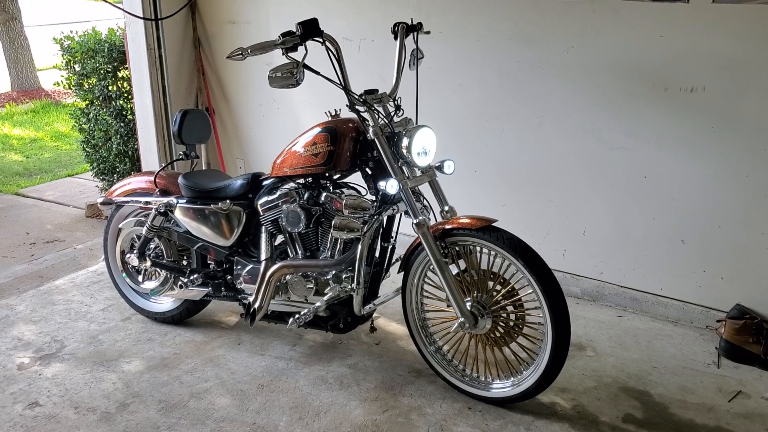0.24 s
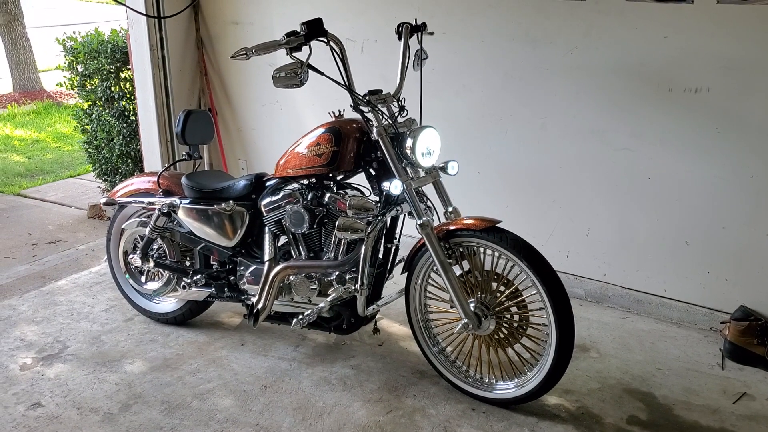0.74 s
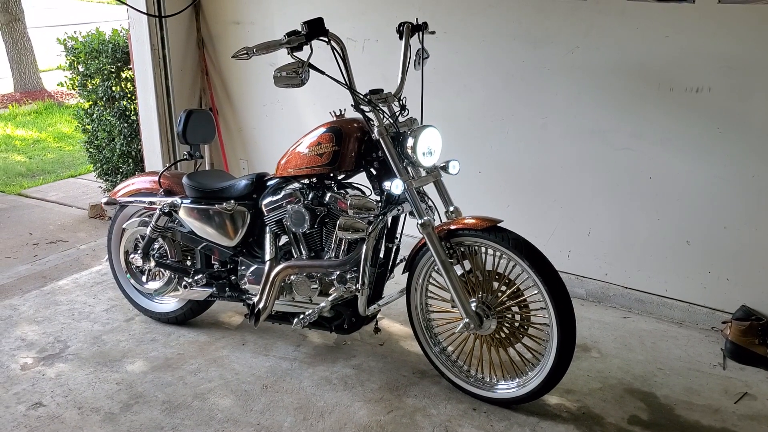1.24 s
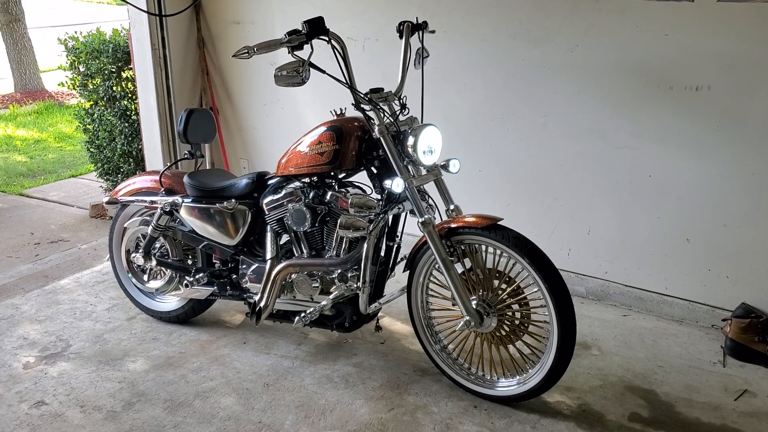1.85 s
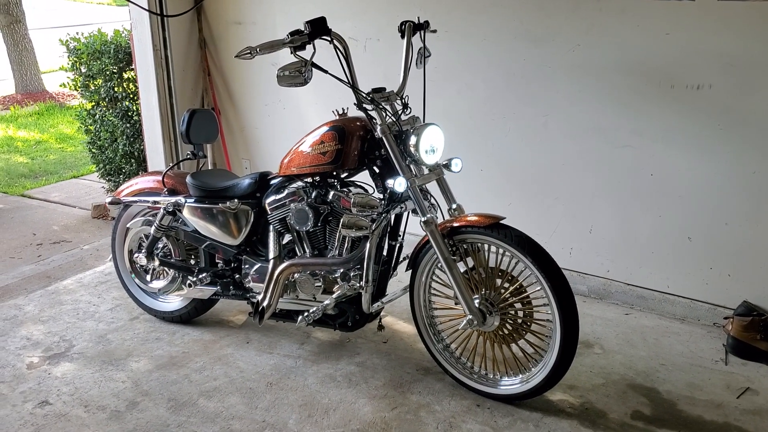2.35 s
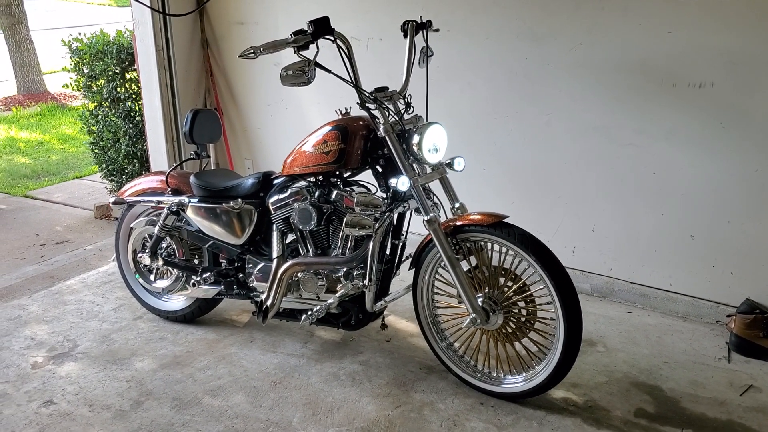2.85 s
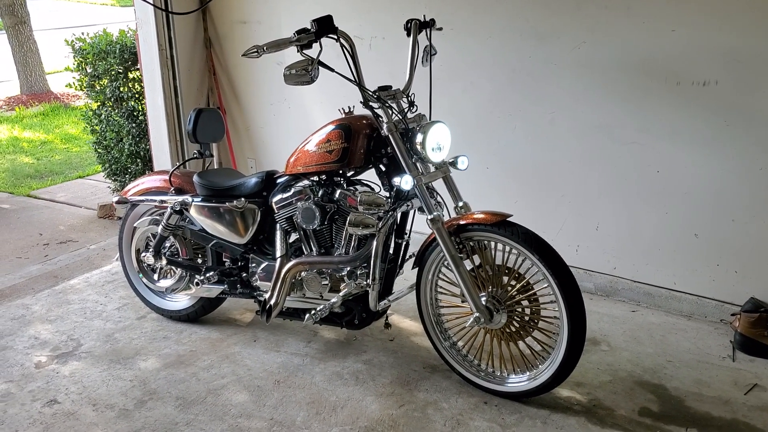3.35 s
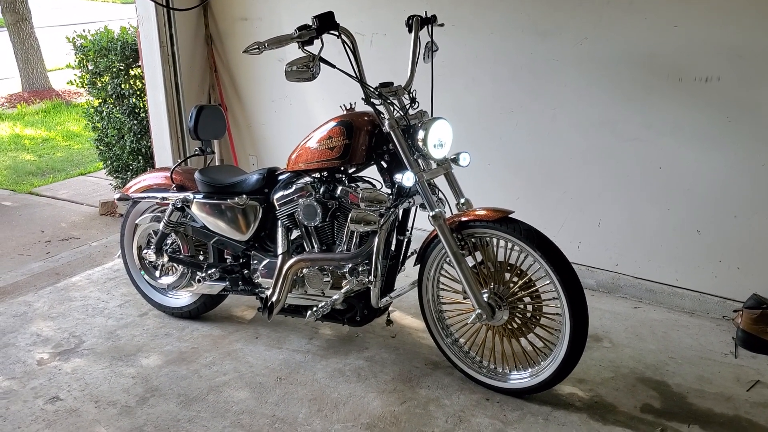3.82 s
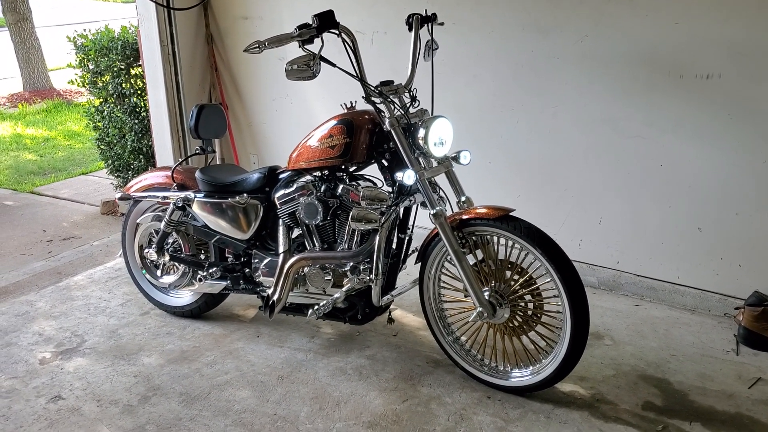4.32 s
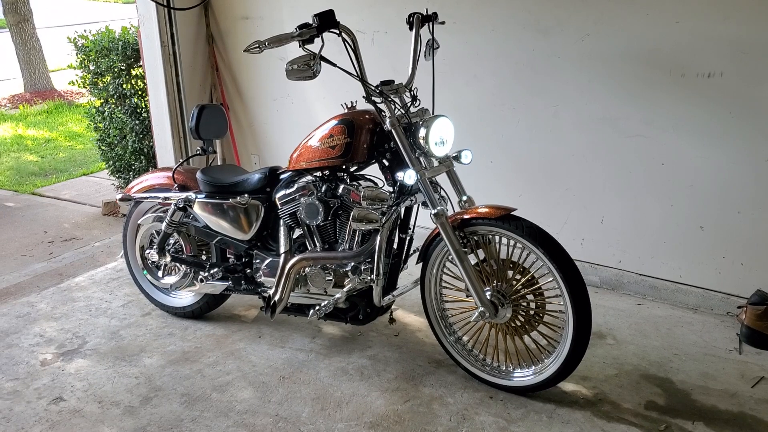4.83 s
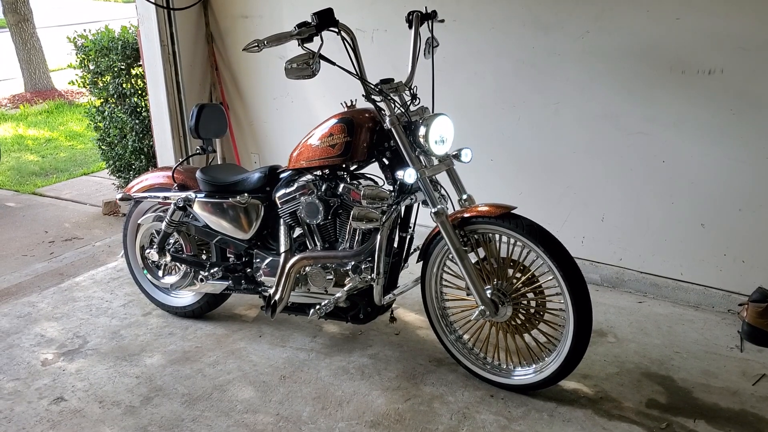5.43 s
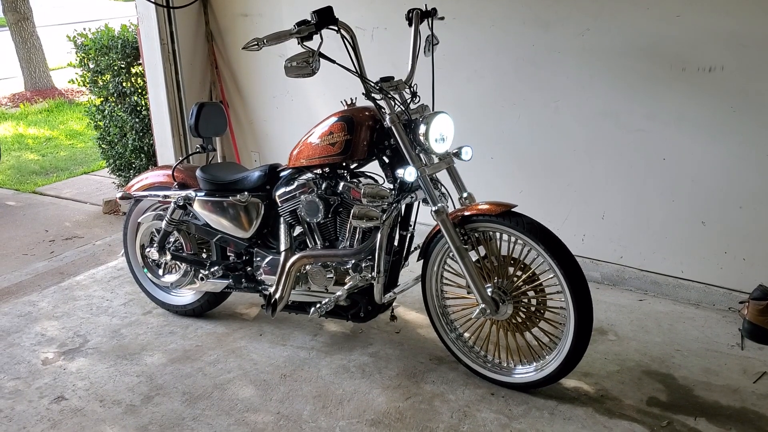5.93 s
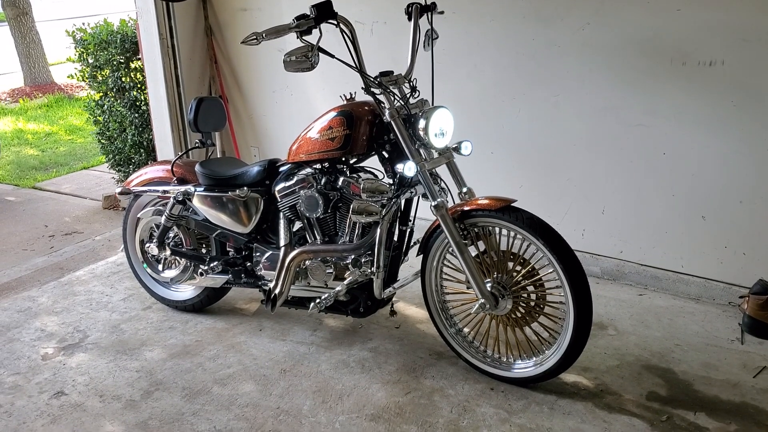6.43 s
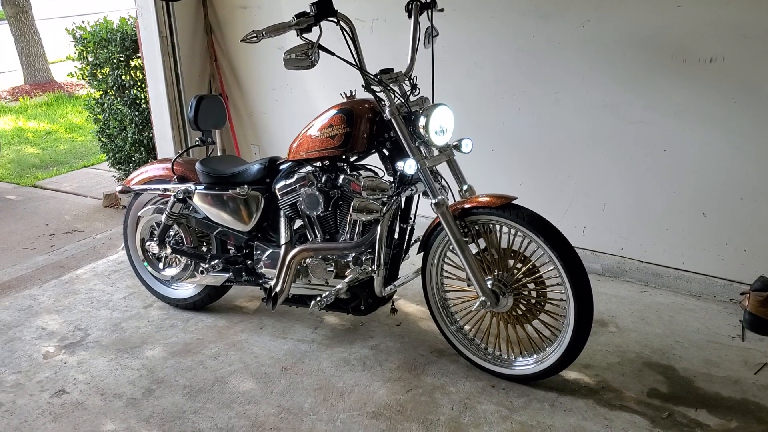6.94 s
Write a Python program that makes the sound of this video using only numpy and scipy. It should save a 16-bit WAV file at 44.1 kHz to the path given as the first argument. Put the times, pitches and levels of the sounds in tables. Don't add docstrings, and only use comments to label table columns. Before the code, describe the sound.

A large air-cooled twin-cylinder motorcycle idles in an open garage, a few metres from a stereo microphone. Deep booming exhaust pulses lope unevenly, about eight cycles a second; one cylinder fires regularly while the other alternates hard cracking burns with weak misfires. Midway it evens into softer barks, then the hard, hissier cracks return. Valve gear rattles constantly, and concrete walls give a short echo.

```python
import sys
import numpy as np
from scipy import signal
from scipy.fft import rfft, irfft, next_fast_len
from scipy.io import wavfile

SR = 44100
rng = np.random.default_rng(int(sys.argv[2]) if len(sys.argv) > 2 else 0)


def gain_from_decibels(decibels):
    exponent = np.asarray(decibels, float) / 20
    return 10 ** exponent


def wav_record(signal):
    frames = np.transpose(np.atleast_2d(signal))
    bounded = np.clip(frames, -1, 1)
    quanta = np.round(bounded * 32767).astype(np.int16)
    wavfile.write(sys.argv[1], SR, quanta)


N = 316220

# t/s, punch/dB, depth/dB, crack/dB
FRONT_STROKES = [(-0.1667, 5.0, 4.0, -15.0), (-0.0432, 1.5, 3, -14), (0.1883, 0.0, -4, -18.5),
                 (0.7827, 0.5, -1, -12.5), (1.1455, -1.5, 2.5, -12.5), (1.5033, 0.0, -3, -17.0),
                 (1.627, -2.5, 0.5, -11.5), (1.7448, -1, -5, -18), (1.9942, -0.5, 0.0, -13.5),
                 (2.4661, 0.5, -9, -24.5), (2.5899, -0.5, 0, -11), (2.7069, 1.0, 2.5, -13.5),
                 (2.9473, -0.5, -0.5, -16), (3.0638, 1.0, -0.5, -18), (3.1883, -1.5, 2, -13),
                 (3.3029, 1.5, -1, -16.5), (3.54, -4.0, 1, -13.5), (3.6575, 1.5, -10, -23),
                 (3.7821, 1, 1, -15), (5.2279, 2.5, 2.0, -12), (5.3434, 1, -5, -24),
                 (5.469, 1.0, 2.5, -15.5), (5.6952, -0.5, -10, -30), (5.8166, -2.5, -4, -15),
                 (6.055, -2.0, 0.5, -14), (6.1705, -0.5, -8, -32), (6.293, -1.5, 0.5, -11),
                 (6.5297, -4, -0.5, -12.5), (6.8826, 3.5, 0.5, -15), (7.1301, 2.0, 1.5, -12.5)]
# t/s, punch/dB, crack/dB, sizzle/dB
REAR_BURNS = [(-.1128, 14, -15, -12), (.0077, 1.5, -10.5, -14.5), (0.241, 4, -13, -16),
              (0.4768, 1.5, -14, -17.5), (0.7133, 3, -25, -18), (0.8324, .2, -25, -20),
              (1.0764, 4.5, -14.5, -18), (1.3162, 4, -9, -19), (1.5569, 4.5, -9, -21.5),
              (1.7975, 4, -19.5, -12), (2.0456, 4.5, -12, -15.5), (2.2825, 4.5, -9, -19),
              (2.52, 5.5, -13.5, -17.5), (2.64, 4, -18.5, -11.5), (2.881, 5, -8, -17.5),
              (3.2387, 4, -14, -12), (3.4725, 3, -13.5, -15.5), (3.7104, 3.5, -23, -12),
              (4.9199, 7.5, -17, -5), (5.1567, 4, -20, -13), (5.2766, 6, -22, -8), (5.5194, 3, -13, -10.5),
              (5.6375, -2.5, -30, -20), (5.7488, 6, -13.5, -8), (5.989, 5.5, -9, -13),
              (6.225, 6.5, -10.5, -12), (6.4617, 4.5, -13, -15), (6.6967, 3.5, -17.5, -13),
              (6.9351, 3.5, -21, -24), (7.058, 0, -26, -26)]
# t/s, punch/dB, depth/dB
REAR_MISFIRES = [(0.12, -9.0, -2), (0.36, -2, 3), (1.19, -5, -5.0), (1.44, -5, 1), (1.92, -1.5, -10.0),
                 (2.16, -4.5, 2), (2.4, -11, -1), (2.76, -4, 4), (3.0, -15, -7.0), (3.12, -1, -7.0),
                 (3.35, -3, -1), (3.6, -2, -11.0), (4.79, 3.5, -8), (5.03, -9, 7), (5.4, -4, -7.0),
                 (5.87, -3, -1), (6.11, -7, -5), (6.34, -7, 4), (6.58, -1.5, -5.0), (6.81, -1.5, -4.0)]
# punch/dB, depth/dB, crack/dB
PLAIN_FRONT = (0.8, 0.69, -12.5)
# punch/dB, depth/dB, crack/dB, sizzle/dB
PLAIN_REAR = (2.7, 2, -25.5, -19)
# t/s, level/dB
FRONT_SIZZLE = [
    (0, -19),
    (2.5, -18),
    (4, -18),
    (5.2, -11.5),
    (5.8, -16.5),
    (6.3, -16.5),
    (7.2, -15),
]
# t/s, extra crack/dB, extra ring/dB, extra bark/dB
JOLTS = [(.19, 2.5, 5.5, 0), (.241, 1.5, 3, 2), (.427, 1.5, 3.5, -1), (.666, 0.5, -7, 0),
         (.784, 0.5, -1, 4), (1.027, 0, -1, 0), (1.266, 1.5, 2, 3), (1.319, -1.5, -1, 2),
         (1.746, -0.5, 10, 0), (1.869, 0.5, 4.5, 2), (2.046, 1, -0.5, 9), (2.83, 2, 0.5, 0),
         (2.882, 0, -2, 4), (3.423, -1.5, 2, 1), (3.542, 0, 5, 1), (3.711, 0, -1, -5), (3.902, 2.5, 6, 1),
         (4.024, 2, 2, 2), (4.144, 3.5, 5.5, 0), (4.387, -0.5, 5, 1), (4.92, 0, -1, -3.5),
         (5.105, -4, 4.5, -2), (5.229, -3, 3.5, 0), (5.47, 0, 6, 0), (5.52, 2, 6.5, 7),
         (5.751, -0.5, 10.5, -2), (5.989, 0, 4.5, 3), (6.057, 0.5, 0.5, 2), (6.227, 0, 3.5, -0.5),
         (6.532, 0, 5.5, 0)]
# f/Hz, t60/s, swing from front pipe, swing from rear pipe
STANDING_WAVES = [(57.3, 0.08, 0.092, 0.033), (77.6, 0.21, -0.038, -0.03), (88.3, 0.2, -0.083, -0.034),
                  (98.6, 0.31, -0.092, -0.031), (112.4, 0.22, 0.077, -0.006), (116.0, 0.35, 0.068, 0.055),
                  (121.1, 0.36, -0.321, -0.09), (128.2, 0.35, 0.061, -0.096), (140.6, 0.34, 0.199, -0.072),
                  (143.7, 0.43, 0.114, 0.046), (147.8, 0.27, -0.25, 0.149), (160.9, 0.26, 0.032, 0.019),
                  (173.4, 0.26, 0.113, 0.047), (186.5, 0.28, -0.084, -0.115), (194.0, 0.35, 0.058, 0.045),
                  (204.5, 0.38, 0.025, 0.048), (218.0, 0.22, -0.088, -0.129), (222.7, 0.32, 0.061, -0.019),
                  (237.2, 0.4, 0.062, -0.134), (238.9, 0.13, -0.103, 0.361), (250.0, 0.32, -0.004, -0.175),
                  (262.2, 0.06, -0.006, 0.1), (278.2, 0.32, 0.006, -0.046), (320.3, 0.46, 0.006, -0.0)]
# f/Hz, front level/dB, rear level/dB, t60/s
METAL_MODES = [(1036, -1.5, -26, 0.043), (1226, -14, 1, 0.065), (1399, 4, -9, 0.05), (1721, 8, 2, 0.055),
               (1753, 9.5, 14.5, 0.031), (1960, -14, -29, .08), (2034, 6, -31, 0.08),
               (2300, -10, -19, 0.36), (2480, -34, 1, 0.05), (2713, -5, 0, 0.2), (2900, 4.5, 11, 0.025),
               (3040, -4, 7, 0.036), (3230, -20.5, 8, 0.024)]
# f/Hz, front level/dB, rear level/dB, t60/s
MOUTH_MODES = [(320.7, -3.5, -1, 0.19), (488.4, 1.5, -7, 0.11), (662.5, 3.5, -2, 0.089),
               (766.7, -0.5, 6.5, 0.075)]
# f/Hz, level per Hz/dB
JET_SPECTRUM = [(530, -18.5), (900, -63.5), (1010, -3), (1130, -18), (1400, -4.5), (1580, -7.5),
                (1740, -8.5), (2200, -6), (2390, -2.5), (4150, -19.5), (7270, -17.5), (8900, -28.5),
                (10900, -20.5), (15600, -33)]
# t/s, level/dB
WALL_ECHOES = [(.0125, -7), (.018, -12), (.027, -12), (.038, -8), (.052, -12)]
# f/Hz, t60/s
GARAGE_T60 = [(100, .3), (500, .35), (2000, .5), (6000, .52), (10000, .42), (15500, .36)]
# f/Hz, correlation
FIELD_LIKENESS = [(60, 0.68), (200, 1), (400, 0.7), (800, 0.47), (2000, 0.25), (8000, 0.025)]
# f/Hz, level per Hz/dB
RUMBLE_SPECTRUM = [(20, -45), (45, -15), (70, -9), (120, 0), (150, 1), (200, -1), (270, -4), (310, -14),
                   (400, -26), (1200, -120)]
# f/Hz, level per Hz/dB
RATTLE_SPECTRUM = [(160, -34), (280, -11), (390, -11), (780, -11), (940, -15), (1580, -11), (1750, -8),
                   (2400, -13), (4100, -26), (7300, -28), (8800, -39), (10900, -37), (15500, -43)]
# f/Hz, left minus right level/dB
PORT_LEVEL = [(60, 0.0), (110, 1.5), (200, 0.0), (380, -4), (700, 3), (1290, -0.5), (2380, -0.5), (4400, 8),
              (8120, 8.5), (15000, -5)]
# f/Hz, phase/rad
PORT_PHASE = [(0, 0), (780, .3), (1210, 2), (2070, 1.4), (2330, 1.4), (2670, 2.5), (3880, 6), (4480, 6.3),
              (7840, 10.7), (16000, 21.6)]

CYCLE_S = 0.1195
LAG_S, MISFIRE_LAG_S = 0.0497, 0.0485
CRACK_SPAN = 2 ** 15


def strokes():
    marks = np.array(FRONT_STROKES)
    gaps = np.diff(marks[:, 0], prepend=marks[0, 0])
    cycle = np.cumsum(np.round(gaps / CYCLE_S)).astype(int)
    front_s = np.interp(np.arange(cycle[-1] + 1), cycle, marks[:, 0])
    rear_s = front_s + LAG_S

    sizzle_db = np.interp(front_s, *np.transpose(FRONT_SIZZLE))
    front = np.column_stack([front_s, np.tile(PLAIN_FRONT, (len(front_s), 1)), sizzle_db])
    front[cycle, :4] = marks

    rear = np.column_stack([rear_s, np.tile(PLAIN_REAR, (len(rear_s), 1))])
    for at, punch_db, crack_db, sizzle_db in REAR_BURNS:
        k = np.abs(rear_s - at).argmin()
        depth_db = 1.08 + 0.7 * punch_db
        rear[k] = at, punch_db, depth_db, crack_db, sizzle_db
    for at, punch_db, depth_db in REAR_MISFIRES:
        k = np.abs(rear_s - at).argmin()
        rear[k, :4] = front_s[k] + MISFIRE_LAG_S, punch_db, depth_db, -np.inf
    return front, rear[rear[:, 0] < N / SR]


def boom(front, rear):
    t = np.arange(SR // 2) / SR
    hz, t60, *swings = np.transpose(STANDING_WAVES)
    waves = np.sin(2 * np.pi * hz[:, None] * t) * decay(t, t60[:, None])
    split_hz = 105
    out = np.zeros(N)
    for pulses, swing in zip((front, rear), swings):
        s, punch_db, depth_db = pulses.T[:3]
        punch = (swing * (hz > split_hz)) @ waves
        depth = (swing * (hz < split_hz)) @ waves
        out += laid(s, gain_from_decibels(punch_db)[:, None] * punch + gain_from_decibels(depth_db)[:, None] * depth)
    return out


def cracks(front, rear_strokes):
    burnt = np.isfinite(rear_strokes[:, 3])
    burns = np.vstack([front, rear_strokes[burnt]])
    s, _, depth_db, crack_db, sizzle_db = burns.T[:, :, None]
    rear = np.arange(len(s))[:, None] >= len(front)
    s = s + 0.0016
    s = s + 0.028 * (rear & (crack_db < -24.5))

    ring_db = np.where(rear, -6.5, -3.5) + 1.5 * rng.standard_normal(s.shape)
    bark_db = -33.5 + 2.15 * depth_db
    for at, more_crack_db, more_ring_db, more_bark_db in JOLTS:
        k = np.abs(s - at).argmin()
        crack_db[k] += more_crack_db
        ring_db[k] += more_ring_db
        bark_db[k] += more_bark_db

    direct = gain_from_decibels(crack_db - 19.5) * jets(sizzle_db)
    direct += gain_from_decibels(crack_db + ring_db - 18) * ringing(METAL_MODES, rear)
    direct += gain_from_decibels(bark_db - 13.5) * ringing(MOUTH_MODES, rear)

    near = laid(s[:, 0], direct)
    walls = sum(gain_from_decibels(db) * np.roll(near, round(delay_s * SR)) for delay_s, db in WALL_ECHOES)
    dull = filtered(walls, lambda hz: 1 / (1 + 1j * hz / 3000))

    source = rfft(direct, CRACK_SPAN)
    wet = [irfft(source * rfft(echoes(len(s)), CRACK_SPAN), CRACK_SPAN) for port in range(2)]
    far = laid(s[:, 0] + 0.006, np.stack(wet, axis=1))
    return near + dull + gain_from_decibels(2.5) * spread(far)


def jets(sizzle_db):
    t = np.arange(CRACK_SPAN // 4) / SR
    snap = 1.04 * decay(t, 0.0075) * onset(t, 0.00052)
    puff = onset(t, 0.0028) * (decay(t, 0.029) + gain_from_decibels(-37) * decay(t, 0.025))

    def colour(hz):
        treble = np.clip(hz / 4000 - 1, 0, 1)
        return gain_from_decibels(along(JET_SPECTRUM, hz) + (sizzle_db + 19) * treble)

    noise = rng.standard_normal((len(sizzle_db), len(t)))
    return unit(filtered(noise * (snap + puff), colour))


def ringing(modes, rear):
    t = np.arange(CRACK_SPAN // 4) / SR
    hz, front_db, rear_db, t60 = np.transpose(modes)
    chance = rng.standard_normal((len(rear), 2, len(modes)))
    level_db = np.where(rear, rear_db, front_db) + 2.5 * chance[:, 0]
    swing = gain_from_decibels(level_db) * np.exp(0.7j * chance[:, 1])
    wave = decay(t, t60[:, None]) * onset(t, 0.0027) * np.exp(2j * np.pi * hz[:, None] * t)
    wave *= 1 + 1.5 * decay(t, 0.03)
    return unit((swing @ wave).imag)


def echoes(count):
    length = CRACK_SPAN // 2
    noise = rng.standard_normal((count + 1, length))
    hz, t, z = signal.stft(noise, SR, nperseg=256)
    dying = decay(t, along(GARAGE_T60, hz)[:, None])
    tails = signal.istft(z * dying, SR, nperseg=256)[1][:, :length]
    tails = tails[1:] + 0.6 * tails[0]
    return tails / np.linalg.norm(tails, axis=1, keepdims=True)


def rumble(front, rear):
    s, punch_db = np.vstack([front, rear]).T[:2]
    t = np.arange(SR // 3) / SR
    power = laid(s, gain_from_decibels(2 * punch_db)[:, None] * decay(t, 3.0) ** 2 * onset(t, 0.0027))
    noise = filtered(rng.standard_normal((2, N)), lambda hz: gain_from_decibels(along(RUMBLE_SPECTRUM, hz)))
    return gain_from_decibels(-27.5) * unit(np.sqrt(power) * spread(noise))


def rattle():
    struck = rng.random((2, N)) < 600 / SR
    force = np.minimum(rng.exponential(1, (2, N)), 3)
    rough = rng.standard_normal((2, N)) * (1 + 3 * struck * force)
    noise = filtered(rough, lambda hz: gain_from_decibels(along(RATTLE_SPECTRUM, hz)))
    return gain_from_decibels(-26.5) * unit(spread(noise))


def spread(pair):
    def turn(hz):
        return np.arccos(np.clip(along(FIELD_LIKENESS, hz), -1, 1)) / 2

    mid = filtered(pair[0], lambda hz: np.cos(turn(hz)))
    side = filtered(pair[1], lambda hz: np.sin(turn(hz)))
    return np.array([mid + side, mid - side])


def decay(t, t60):
    return gain_from_decibels(-60 * t / t60)


def onset(t, tau):
    return 1 - np.exp(-t / tau)


def laid(times, sounds):
    out = np.zeros(sounds.shape[1:-1] + (N + 2 * SR,))
    for s, sound in zip(times, sounds):
        start = round(s * SR) + SR
        out[..., start:start + sound.shape[-1]] += sound
    return out[..., SR:SR + N]


def filtered(x, response):
    m = next_fast_len(x.shape[-1] + 4096)
    return irfft(rfft(x, m) * response(np.fft.rfftfreq(m, 1 / SR)), m)[..., :x.shape[-1]]


def along(points, hz):
    f, value = np.transpose(points)
    return np.interp(np.log(hz + 1), np.log(f + 1), value)


def unit(x):
    return x / np.sqrt(np.mean(x ** 2) + 1e-20)


def scene():
    front, rear = strokes()
    return gain_from_decibels(0.4) * boom(front, rear) + cracks(front, rear) + rumble(front, rear) + rattle()


def top_cut(x):
    return signal.sosfilt(signal.butter(12, 15780, fs=SR, output="sos"), x)


def record(dry):
    def ports(hz):
        level = np.log(gain_from_decibels(along(PORT_LEVEL, hz)))
        phase = np.interp(hz, *np.transpose(PORT_PHASE))
        pair = np.exp(np.outer([0.5, -0.5], level + 1j * phase))
        return pair * (hz < 15760) / (1 + (26 / (hz + 1)) ** 4)

    x = filtered(dry, ports)
    mix = x / (1 + np.abs(x) ** 8) ** (1 / 8)
    return top_cut(mix)


dry = scene()
out = record(dry)
wav_record(out)
```